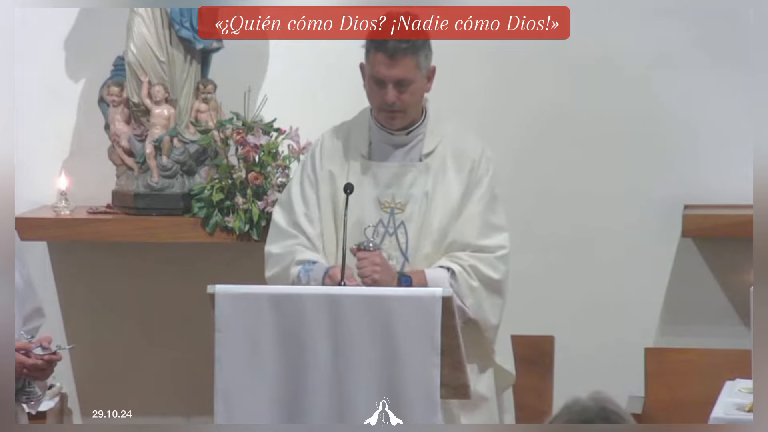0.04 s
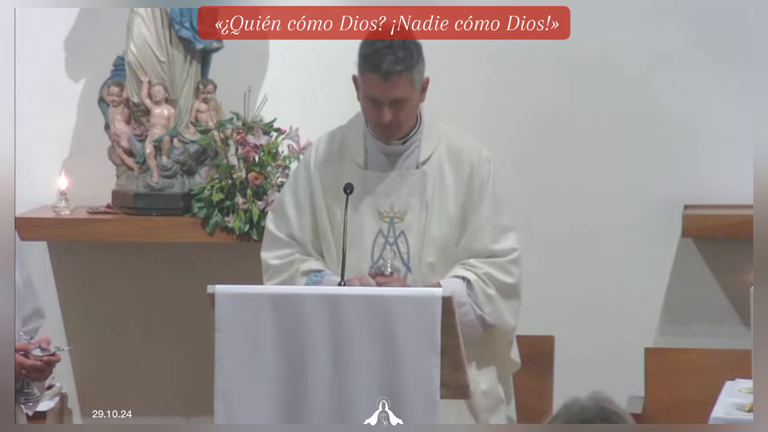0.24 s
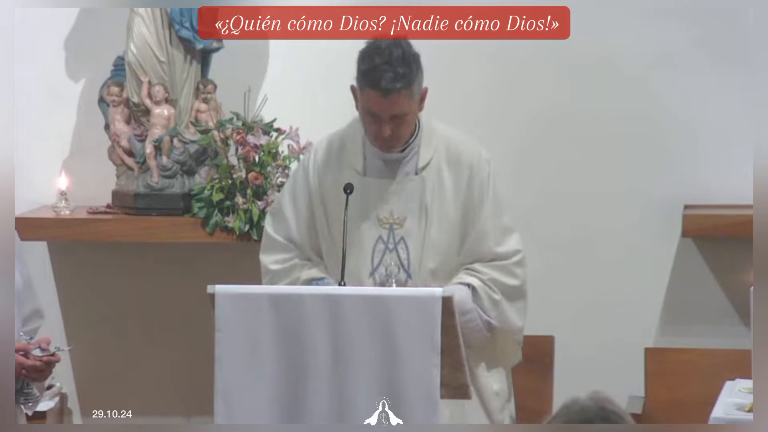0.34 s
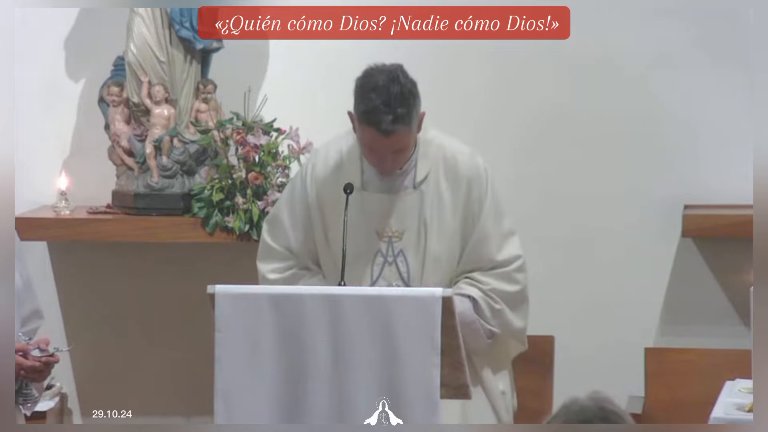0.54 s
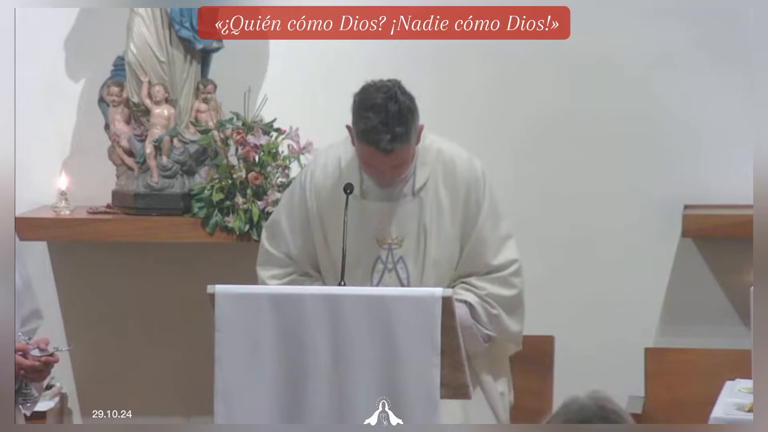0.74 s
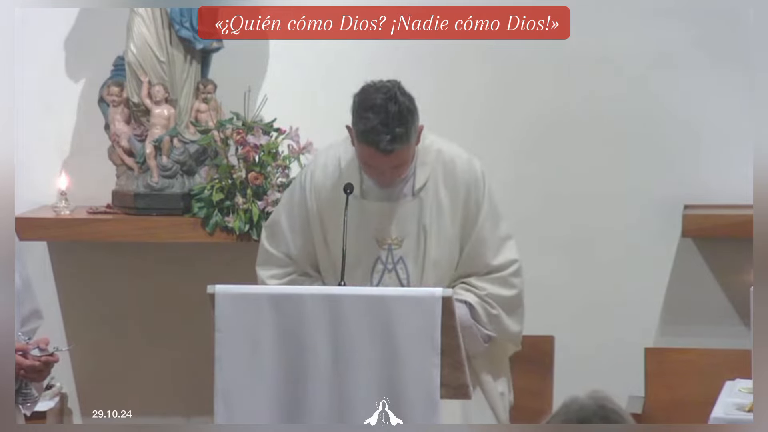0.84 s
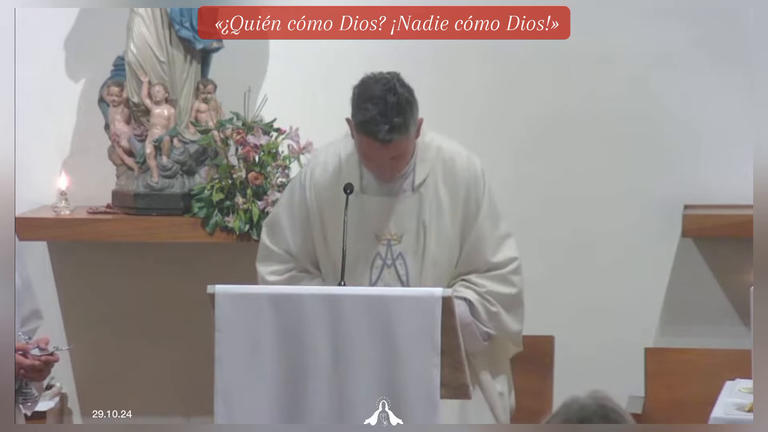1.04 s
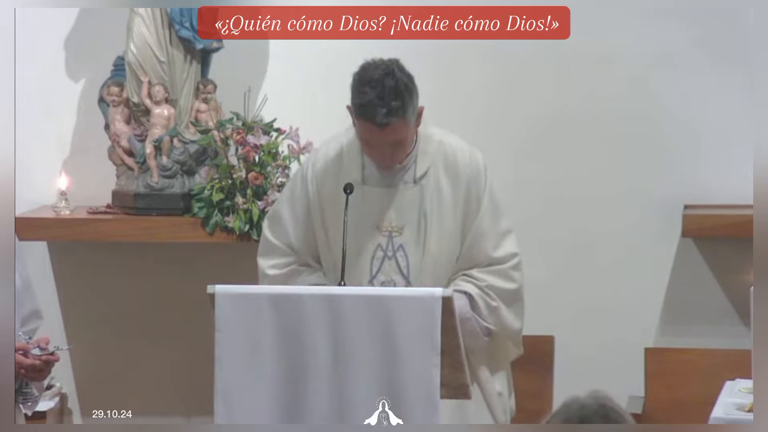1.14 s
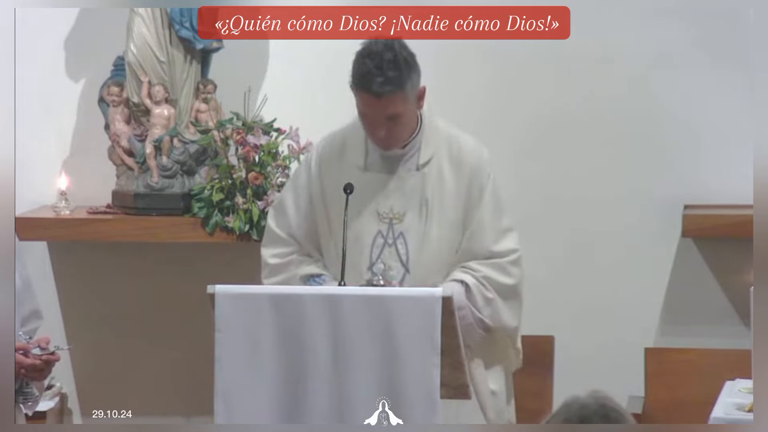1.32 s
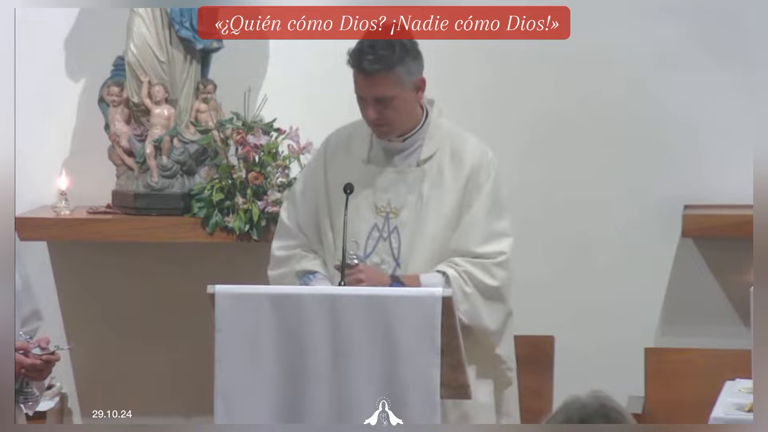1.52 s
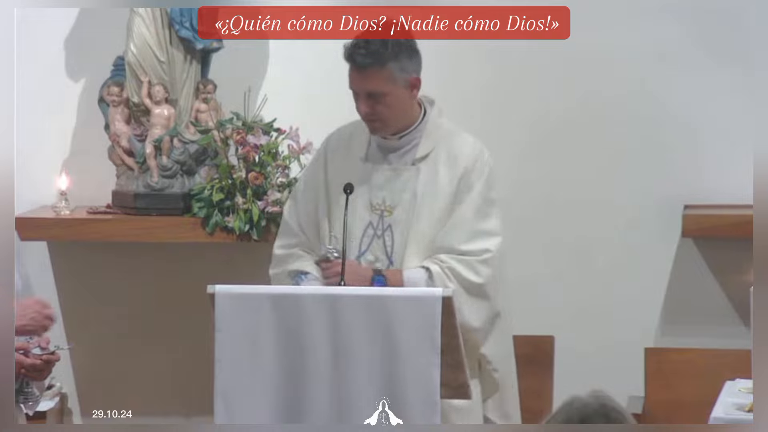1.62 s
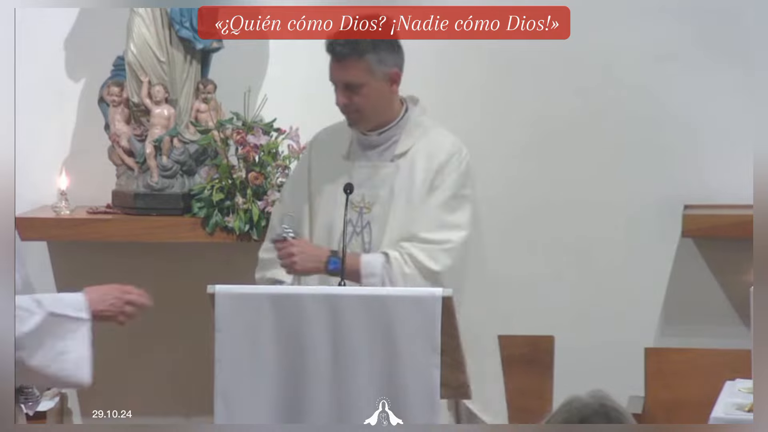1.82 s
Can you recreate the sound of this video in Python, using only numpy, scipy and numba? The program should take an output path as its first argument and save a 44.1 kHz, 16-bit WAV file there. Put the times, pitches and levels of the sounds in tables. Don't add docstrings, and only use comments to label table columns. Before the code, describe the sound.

Metal censer clinks sharply on its chains in two bursts, inside a hissy, echoing church hall

```python
import sys
import numpy as np
from scipy import signal
from scipy.fft import rfft, irfft
from scipy.io import wavfile
from numba import njit

SR = 44100
rng = np.random.default_rng(int(sys.argv[2]) if len(sys.argv) > 2 else 0)


def rack_gain(trim_db):
    fader = np.asarray(trim_db, float)
    return 10 ** (fader / 20)


def wav_out(sig):
    wavfile.write(sys.argv[1], SR, np.round(np.clip(np.atleast_2d(sig).T, -1, 1) * 32767).astype(np.int16))


N = 83790

# pitch_hz, level_db, t60_s
BOWL_MODES = [(4753, -18, .9), (6535, -9, .7), (6797, -9, .5), (7617, -1, .8), (8430, -10, .5),
              (9206, -4, .7), (9730, -4, .6), (9885, -8, .5), (10260, -9, .5), (11897, -6, .55),
              (12453, -6, .45), (12524, -7, .4), (15133, -9, .35), (15690, -13, .4)]
# pitch_hz, level_db, t60_s
LID_MODES = [(4950, -15, .6), (5459, -15, .35), (5733, -16, .3), (6342, -12, .5), (7195, -11, .25),
             (7540, -8, .5), (7694, -8, .6), (7935, -7, .35), (9119, -9, .5), (9260, -7, .4),
             (10790, -9, .4), (13080, -9, .35), (13500, -11, .3), (8212, -11, .45)]
# pitch_hz, level_db, t60_s
FOOT_MODES = [(3030, -27, .4), (5900, -17, .3), (3420, -26, .4), (4600, -21, .4), (4200, -20, .7),
              (11400, -14, .4), (5020, -16, 1.0), (9680, -8, .5)]
# freq_hz, level_db
LINK_SPECTRUM = [(2500, -9.5), (3400, -11), (4900, -5.5), (6100, -2.5), (7500, 1.5), (11000, -1),
                 (13000, -5), (15800, -5)]
METAL_MODES = np.array(BOWL_MODES + LID_MODES + FOOT_MODES, float)


def table(points, hz):
    p = np.array(points, float)
    return np.interp(np.log(np.maximum(hz, 1)), np.log(p[:, 0]), p[:, 1])


def level(x, db):
    return x * rack_gain(db) / np.sqrt(np.mean(x ** 2))


def noise(gain):
    return irfft(rfft(rng.standard_normal(N)) * gain, N)


def walk(rate_hz):
    f = np.fft.rfftfreq(N, 1 / SR)
    return level(noise(1 / (1 + (f / rate_hz) ** 2)), 0)


def poles(hz, t60_s):
    return np.exp(2j * np.pi * hz / SR - np.log(1000) / (t60_s * SR))


@njit
def ring(taps, poles, gains):
    out = np.zeros(len(taps))
    for k in range(len(poles)):
        z = 0j
        for i in range(len(taps)):
            z = z * poles[k] + taps[i] * gains[k]
            out[i] += z.imag
    return out


def censer():
    parts = body()
    metal = clinks(*parts) + jingle(*parts) + chimes()
    return signal.sosfilt(signal.butter(4, 1900, "high", fs=SR, output="sos"), metal)


def body():
    body_db, ring_share, twin_share = -9, 0.43, 0.00417
    seam_db, seam_t60_s = -14, 0.19
    main = METAL_MODES * [1, 1, ring_share] + [0, body_db, 0]
    twins = np.tile(main, (2, 1)) - [0, 3, 0]
    twins[:, 0] *= 1 + twin_share * rng.standard_normal(len(twins))
    hz = rng.uniform(2800, 15800, size=110)
    seams = np.c_[hz, table(LINK_SPECTRUM, hz) + seam_db, np.full(len(hz), seam_t60_s)]
    return np.vstack([main, twins, seams]).T


def link_hz(shape):
    spread = 0.0194
    draw, near = rng.random((2,) + shape), METAL_MODES[:, 0]
    picked = near[(draw[0] * len(near)).astype(int)]
    crowd = np.minimum(picked * (1 + spread * rng.standard_normal(shape)), 16000)
    anywhere = 2200 + 3 * draw[1] * 13600
    return np.where(draw[1] < 1 / 3, anywhere, crowd)


def strike_db(hz, focus_hz):
    focus_db, focus_oct, tilt_db = 5, 0.22, 9.5
    peak = focus_db * np.exp(-(np.log2(hz / focus_hz) / focus_oct) ** 2)
    return peak + tilt_db * np.log2(hz / 9000) * np.log2(focus_hz / 7000)


def bounces(length_s, draw, span):
    taps_per_s, first_db = 1200, -6
    when_s = np.r_[0, np.cumsum(-np.log(draw[1:, 0]) / taps_per_s)]
    size = rack_gain(first_db * (when_s == 0)) * np.exp(-(when_s / length_s) ** 2)
    signed = size * np.sign(draw[:, 0] - .5)
    return np.bincount((when_s * SR).astype(int), signed, span)[:span] + 1e-18


def clinks(hz, db, t60_s):
    # start_s, peak_db, focus_hz, rattle_s, body_db
    swing = [(.0261, -11.5, 10200, 0.0019, -6), (.0620, -13, 12200, 0.0021, -32),
             (.1715, -23, 6770, 0.0025, -18), (.2046, 6.5, 12500, 0.0088, 9),
             (.2140, 7.5, 7500, 0.0054, -7.5), (.2230, 9, 10000, 0.0057, -4),
             (.2380, -2, 10200, 0.0047, 12), (.2790, 6, 9600, 0.0046, -1), (.2960, -8, 9700, 0.007, 4),
             (.3270, -0.5, 10000, 0.006, -5), (.3520, -7.5, 7400, 0.0077, -3),
             (.3890, -4.5, 10200, 0.0052, -25), (.4280, -3.5, 12100, 0.0079, -16),
             (.4670, -43, 13500, 0.003, 3), (.4823, -6, 13200, .005, -25), (.5000, -6, 8800, 0.0082, -21),
             (.5450, -10.5, 11500, 0.0021, -21), (.5553, 0, 8360, 0.0046, -10),
             (.5620, -2.5, 9100, 0.0078, -18), (.5780, -6.5, 5600, 0.0027, -26)]
    # start_s, peak_db, focus_hz, rattle_s, body_db
    swing_back = [(1.0893, 1, 10400, 0.0074, 8), (1.097, -0.5, 12900, 0.019, -37),
                  (1.1118, 1.5, 11000, 0.0073, 4), (1.118, 1.5, 7850, 0.0019, -3),
                  (1.131, -1, 12600, 0.0082, -2), (1.183, -17, 7850, 0.0015, -27),
                  (1.205, -6.5, 8460, 0.0023, -7), (1.211, -4.5, 8300, 0.0062, -6),
                  (1.362, -7.5, 12800, 0.0026, 4), (1.37, -10, 9800, 0.012, -27),
                  (1.3890, -4.5, 14600, 0.0024, -11), (1.396, -9.5, 10500, 0.0043, -8),
                  (1.4096, -6.5, 11200, 0.0032, -11), (1.445, -31, 10000, 0.0026, -8),
                  (1.4965, -12, 7150, 0.0015, -9), (1.507, -21, 13000, 0.0068, -6),
                  (1.511, -18, 5100, 0.01, -24), (1.7818, -21, 7200, 0.0024, 1)]
    scatter_db, link_db, link_t60_s, blow_db = 2.5, -10, 0.025, -10
    rows, out = swing + swing_back, np.zeros(N)
    span, short = int(.35 * SR), int(SR / 10)
    chance = rng.standard_normal((len(rows), len(hz), 2))
    draws, links = rng.random((len(rows), 60, 2)), link_hz((len(rows), 110))
    for row, c, draw, link in zip(rows, chance, draws, links):
        start_s, peak_db, focus_hz, rattle_s, body_db = row
        taps = bounces(rattle_s, draw, span)
        body_gain = rack_gain(db + body_db + scatter_db * c[:, 0] + strike_db(hz, focus_hz))
        hit = ring(taps, poles(hz, t60_s), body_gain * np.exp(3j * c[:, 1]))
        hit *= np.linspace(1, 0, span)
        link_gain = rack_gain(table(LINK_SPECTRUM, link) + link_db + strike_db(link, focus_hz))
        phase = np.exp(1j * np.arange(len(link)) ** 2)
        hit[:short] += ring(taps[:short], poles(link, link_t60_s), link_gain * phase)
        hit *= rack_gain(peak_db + blow_db) / np.std(hit[:short // 10])
        i = int(start_s * SR)
        out[i:i + span] += hit[:N - i]
    return out


def jingle(hz, db, t60_s):
    # time_s, level_db
    strength = [(.06, -31), (.07, -15), (.16, -59), (.2, -42), (0.234, -5), (.35, -8.5), (.53, -13.5),
                (.61, -20.5), (.8, -65), (1.085, -29), (1.11, -36), (1.16, -46), (1.23, -19), (1.332, -43),
                (1.379, -40), (1.45, -36), (1.52, -30), (1.6, -36.5)]
    ticks_per_s, scatter_db, link_t60_s = 220, 3.225, 0.037
    link_db, body_db, total_db = -13, -7.5, -11.5
    swell = rack_gain(np.interp(np.arange(N) / SR, *np.array(strength).T))
    out = np.zeros(N)
    for k in range(10):
        draw, link = rng.random((N, 2)), link_hz((14,))
        ticks = (draw[:, 0] < ticks_per_s / SR) * rack_gain(scatter_db * draw[:, 1] ** 2) + 1e-18
        pitch_hz = np.r_[link, hz[k::10]]
        decay_s = np.r_[np.full(len(link), link_t60_s), t60_s[k::10]]
        gain = rack_gain(np.r_[table(LINK_SPECTRUM, link) + link_db, db[k::10] + body_db])
        phase = np.exp(1j * np.arange(len(pitch_hz)) ** 2)
        out += ring(ticks * swell, poles(pitch_hz, decay_s), gain * phase)
    return out * rack_gain(total_db)


def chimes():
    # start_s, pitch_hz, level_db, t60_s
    caught = [(.026, 6800, -37, .3), (.026, 8430, -32, .15), (.062, 5020, -38, .1), (.062, 5730, -40, .12),
              (.062, 6340, -34, .3), (.205, 5020, -13, .13), (.205, 5900, -14, .07), (.205, 6800, -6, .17),
              (.205, 7620, -3, .2), (.205, 12450, -9, .35), (.205, 13080, -10, .16), (.216, 9210, -8, .18),
              (.216, 9730, -4, .22), (.216, 13500, -12, .12), (.225, 4750, -23, .5), (.225, 9260, -15, .45),
              (.225, 9680, -11, .35), (.24, 4200, -33, .8), (.242, 6535, -16, .4), (.25, 3420, -37, .9),
              (.308, 7620, -18, .7), (.328, 5460, -31, .26), (.352, 7620, -19, .7), (.428, 7195, -12, .09),
              (.428, 8430, -27, .15), (.428, 11900, -24, .13), (.5, 6340, -25, .16), (.5, 7690, -17, .14),
              (.555, 4950, -24, .16), (.555, 5730, -19, .14), (.555, 6340, -19, .14), (.555, 7690, -10, .1),
              (.562, 5460, -25, .2), (.562, 7935, -17, .2), (1.0905, 6535, -12, .28),
              (1.0905, 7540, -16, .35), (1.0905, 9260, -18, .15), (1.0905, 13080, -12, .13),
              (1.106, 5020, -23, .16), (1.11, 5460, -20, .12), (1.108, 11900, -11, .11),
              (1.118, 4950, -20, .1), (1.118, 7935, -13, .1), (1.118, 11900, -14, .13),
              (1.13, 5460, -35, .9), (1.17, 4200, -41, 1.1), (1.211, 7620, -25, .3), (1.211, 7935, -23, .14),
              (1.363, 9260, -25, .14), (1.366, 6800, -26, .16),
              (.075, 5450, -41, .2), (.085, 3040, -49, .15), (.235, 4990, -25, .9), (.26, 5490, -27, .5),
             (.556, 4900, -34, .6), (1.117, 3410, -36, .15), (1.125, 5000, -35, .9),
             (1.409, 10790, -30, .14), (1.496, 5460, -38, .07), (1.44, 5020, -45, .4)]
    rise_s, split, twin_db, flutter_db, flutter_hz = .003, .007, -4, 4, 45
    out, rows, modes = np.zeros(N), caught, METAL_MODES[:, 0]
    flutter = [rack_gain(flutter_db * walk(flutter_hz)) for _ in range(8)]
    chance = rng.standard_normal((len(rows), 3))
    for k, ((start_s, pitch_hz, db, t60_s), c) in enumerate(zip(rows, chance)):
        hz = modes[np.argmin(np.abs(modes - pitch_hz))]
        t = np.maximum(np.arange(N) / SR - start_s, 0)
        tone = np.sin(2 * np.pi * hz * t + c[0])
        twin = np.sin(2 * np.pi * hz * (1 + split * c[1]) * t + 3 * c[2])
        envelope = rack_gain(db - 60 * t / t60_s) * np.minimum(t / rise_s, 1)
        out += (tone + rack_gain(twin_db) * twin) * flutter[k % len(flutter)] * envelope
    return out


def hall(x):
    t60_s, top_t60_s, gap_s, hall_db = .9, .45, 0.039, -11.5
    t = np.arange(SR) / SR
    lowpass = signal.butter(2, 7000, fs=SR, output="sos")
    low = signal.sosfilt(lowpass, rng.standard_normal(SR))
    white = rng.standard_normal(SR)
    tail = low * rack_gain(-60 * t / t60_s) + white * rack_gain(-60 * t / top_t60_s)
    tail *= np.clip(t / gap_s, 0, 1)
    return signal.fftconvolve(x, tail / np.sqrt(np.sum(tail ** 2)))[:N] * rack_gain(hall_db)


def rumble():
    # freq_hz, level_db_per_hz
    spectrum = [(15, -45), (28, -14.5), (64, -19.5), (95, -9.5), (179, -10), (270, -6), (305, -2.5),
                (444, -2.5), (1500, -15.5), (1950, -46), (3300, -120)]
    flicker_db, flicker_hz = 2, 5
    f, air = np.fft.rfftfreq(N, 1 / SR), np.zeros(N)
    for low_hz in 25 * 2. ** np.arange(6):
        octave = (f >= low_hz) * (f < min(2 * low_hz, 1500))
        air += noise(rack_gain(table(spectrum, f)) * octave) * rack_gain(flicker_db * walk(flicker_hz))
    return level(air, -36.5)


def hiss():
    # freq_hz, level_db_per_hz
    spectrum = [(1500, -10), (3000, -13), (4600, -13.5), (7100, -13), (11000, -13), (15800, -5)]
    comb_db, comb_hz, comb_peak_hz, comb_from_hz = 2, 535, 13530, 5600
    f = np.fft.rfftfreq(N, 1 / SR)
    ripple = comb_db * np.cos(2 * np.pi * (f - comb_peak_hz) / comb_hz)
    ripple /= 1 + np.exp((comb_from_hz - f) / 300)
    return level(noise(rack_gain(table(spectrum, f) + ripple) * (f >= 1500)), -29.5)


def whine():
    partials = [(47, -52), (49, -46), (50, -48), (50.56, -50), (51, -49), (52, -46), (53, -43)]
    step_hz, wobble_hz, waver_db, waver_hz = 123.6, 2.1, 3.6, 26
    centre_hz, width_hz, band_db = 6200, 570, -41
    f, t = np.fft.rfftfreq(N, 1 / SR), np.arange(N) / SR
    drift = wobble_hz * np.cumsum(walk(16)) / SR
    lines = np.zeros(N)
    for multiple, db in partials:
        gain = rack_gain(db + 2 + waver_db * walk(waver_hz))
        lines += gain * np.sin(2 * np.pi * (multiple * step_hz * t + drift + rng.random()))
    return lines + level(noise(np.exp(-((f - centre_hz) / width_hz) ** 2)), band_db)


def scene():
    metal = censer()
    return np.tile(metal + hall(metal) + rumble() + hiss() + whine(), (2, 1))


@njit
def follow(x, up, down):
    y, e = np.empty(len(x)), x[0]
    for i in range(len(x)):
        e += (x[i] - e) * (up if x[i] > e else down)
        y[i] = e
    return y


def top_cut(x):
    return signal.sosfilt(signal.butter(12, 16550, fs=SR, output="sos"), x)


def record(dry):
    top_db, ratio, attack_s, release_s, top_hz = -16.5, 1.63, 0.0053, 0.11, 15720
    env = follow(np.minimum(np.abs(dry[0]), 1), 1 / (attack_s * SR), 1 / (release_s * SR))
    ducked = dry * np.minimum(1, rack_gain(top_db) / (env + 1e-9)) ** (1 - 1 / ratio)
    edge = np.clip((top_hz + 150 - np.fft.rfftfreq(N, 1 / SR)) / 250, 0, 1) ** 2
    limited = irfft(rfft(np.clip(ducked, -1, 1)) * edge, N)
    return top_cut(np.clip(limited, -1, 1))


dry = scene()
out = record(dry)
wav_out(out)
```